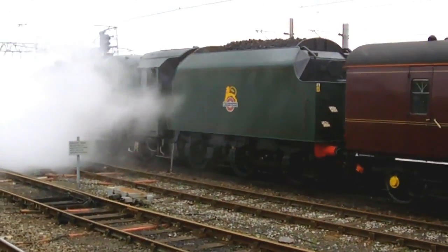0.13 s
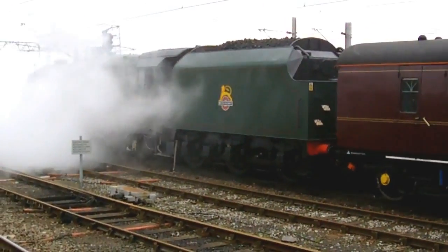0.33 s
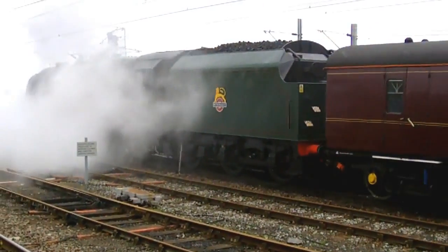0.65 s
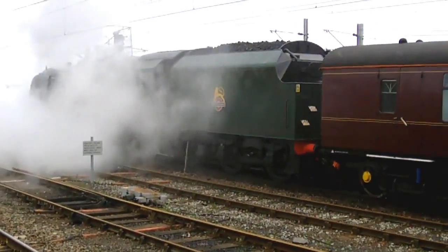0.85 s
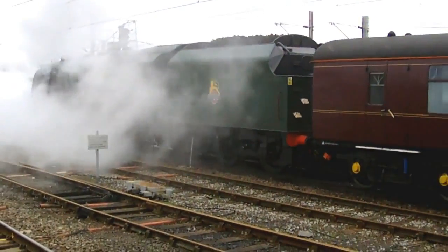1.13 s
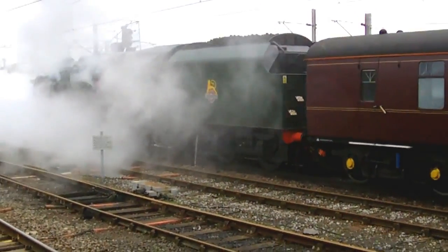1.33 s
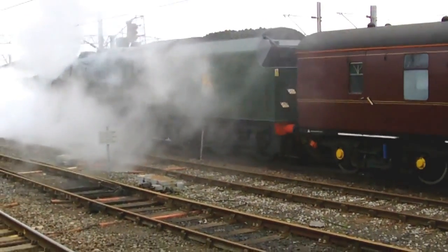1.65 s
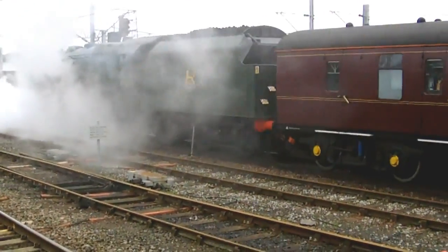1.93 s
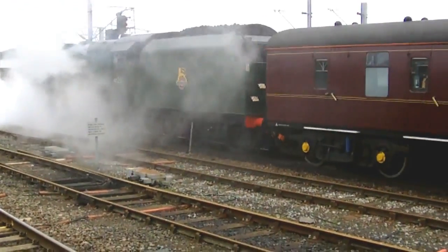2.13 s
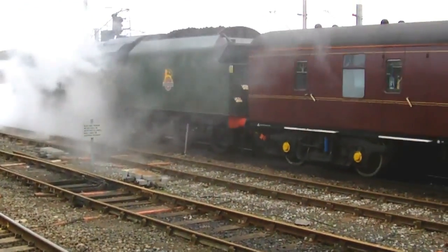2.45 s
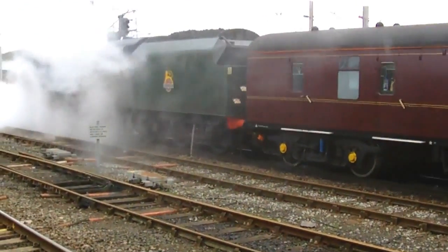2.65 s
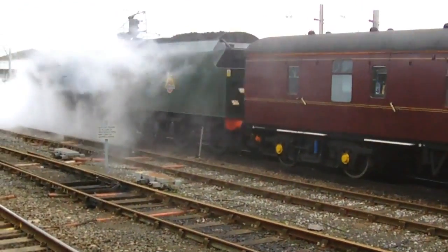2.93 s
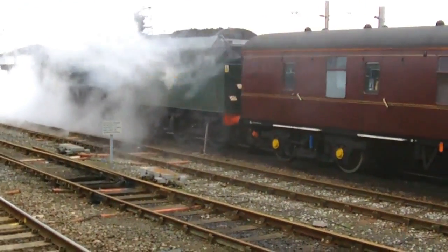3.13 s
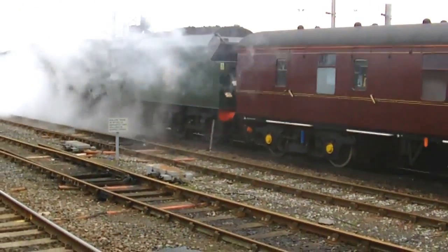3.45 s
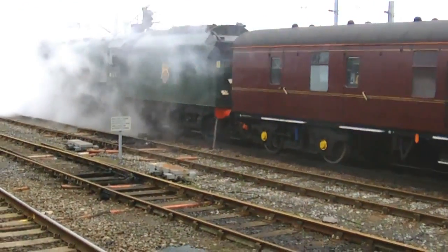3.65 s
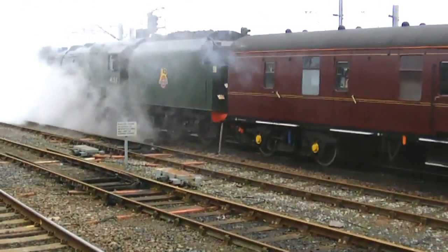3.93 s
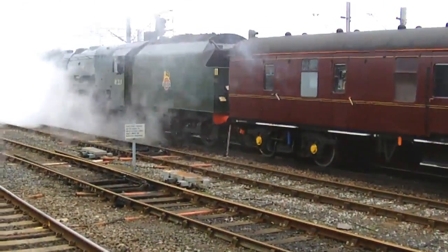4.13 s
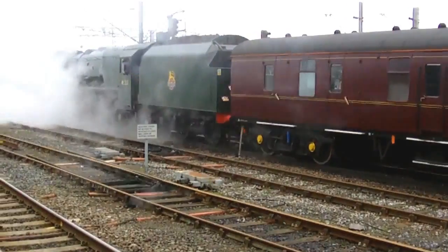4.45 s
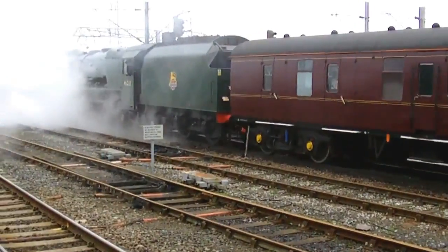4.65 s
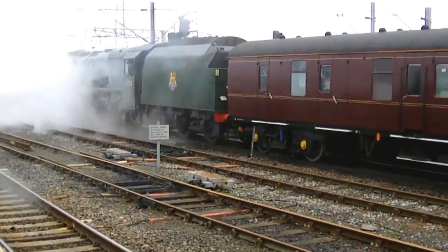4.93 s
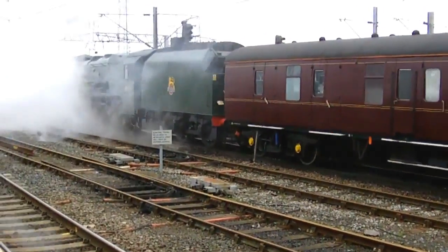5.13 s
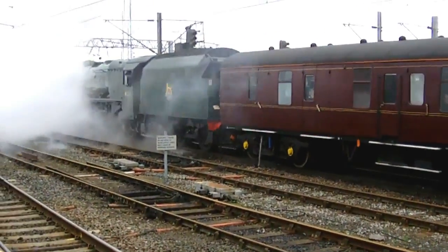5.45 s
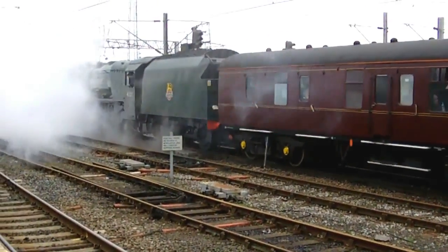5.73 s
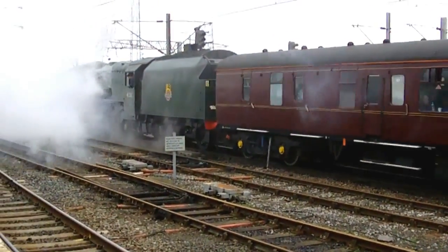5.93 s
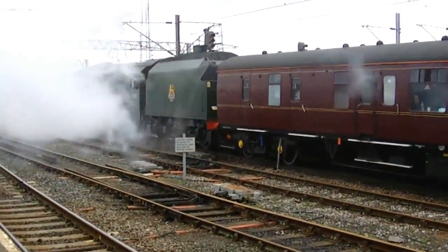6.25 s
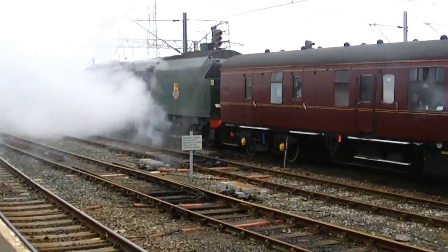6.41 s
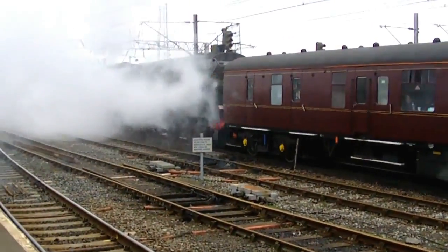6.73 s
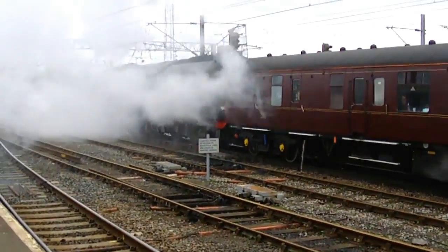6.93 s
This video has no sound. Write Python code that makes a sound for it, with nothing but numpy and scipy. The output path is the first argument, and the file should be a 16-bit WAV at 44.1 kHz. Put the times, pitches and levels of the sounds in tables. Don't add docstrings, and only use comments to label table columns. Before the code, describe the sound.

A steam locomotive pulls away with drain cocks blowing a loud, harsh, bright hiss, broken by wind gusts that knock and choke a small microphone.

```python
import sys
import numpy as np
from scipy import signal
from scipy.fft import rfft, irfft, next_fast_len
from scipy.io import wavfile
from scipy.ndimage import uniform_filter1d, map_coordinates

SR = 44100
rng = np.random.default_rng(int(sys.argv[2]) if len(sys.argv) > 2 else 0)


def to_linear_factor(level_db):
    exponent = np.asarray(level_db, float) / 20
    return 10 ** exponent


def generate_wav(sig):
    pcm = np.round(np.clip(np.atleast_2d(sig).T, -1, 1) * 32767).astype(np.int16)
    wavfile.write(sys.argv[1], SR, pcm)


N = 312228

# (time [s], level [dB], fullness of the body [dB])
STEAM = [(0, -7, -1.5), (.69, -9.5, 0.5), (.8, -15, 1.5), (1.21, -10, 0.5), (1.32, -8, 1.5),
         (2.03, -6.5, -2), (2.6, -12.5, -1), (3.05, -8.5, .8), (3.72, -8, -2), (4.17, -14.5, -0.7),
         (4.62, -12, 0.5), (4.74, -9.5, -0.6), (5.64, -16.5, -0.8), (5.72, -19.5, -1.6), (6.13, -17.5, 1.5),
         (6.21, -12, 0.5), (6.89, -9, 1.3), (7.07, -11, -1)]
CALM_DB = -42.5


def unit(x):
    return x / np.sqrt(np.mean(x ** 2) + 1e-20)


def along(points, hz):
    f, v = np.transpose(points)
    return np.interp(np.log(hz + 1), np.log(f + 1), v)


def curves(rows):
    s, *columns = np.transpose(rows)
    return [np.interp(np.arange(N) / SR, s, column) for column in columns]


def wobble(rate):
    knots = rng.standard_normal(int(N * rate / SR) + 4)
    return map_coordinates(knots, [np.arange(N) * rate / SR])


def filtered(x, response):
    m = next_fast_len(N + 8192)
    hz = np.fft.rfftfreq(m, 1 / SR)
    return irfft(rfft(x, m) * response(hz), m)[..., :N]


def rush(response, patchy_db):
    z = signal.stft(rng.standard_normal(N + 512), nperseg=512)[2]
    patches = uniform_filter1d(rng.standard_normal(z.shape), size=6, axis=0)
    patches = uniform_filter1d(patches, size=8, axis=1)
    noise = signal.istft(z * to_linear_factor(patchy_db * unit(patches)), nperseg=512)[1][:N]
    return unit(filtered(noise, response))


def bumps(rows, edge_s):
    out, t = np.zeros(N), np.arange(N) / SR
    for s, length, height in rows:
        near = slice(max(int((s - .03) * SR), 0), int((s + length + .03) * SR))
        inside = np.minimum(t[near] - s, s + length - t[near])
        shape = np.clip(inside / edge_s + 1, 0, 1)
        out[near] = np.maximum(out[near], height * shape)
    return out


def tents(rows, rise, fall, floor):
    coarse = np.arange(0, N, 64)
    late = coarse / SR - np.array(rows)[:, :1]
    top = np.array(rows)[:, 1:] - np.where(late < 0, -rise * late, fall * late)
    return np.interp(np.arange(N), coarse, np.maximum(top.max(axis=0), floor))


def level():
    # (deepest time [s], depth [dB], recovery [s])
    ducks = np.array([(.73, 8.5, 0.056), (.94, 5.5, 0.034), (1.1, 3.5, .03), (1.205, 6.5, 0.017),
                      (1.47, 3, 0.11), (1.81, 4.5, 0.071), (2.39, 0, 0.067), (2.56, 6, 0.028),
                      (2.71, 7.5, 0.071), (2.879, 8.5, 0.022), (2.97, 7, .06), (3.24, 2, 0.079),
                      (3.47, 2, .06), (3.64, 7, 0.052), (4.27, 10, 0.082), (4.45, 7, 0.094),
                      (4.57, 2, 0.062), (4.82, 7, 0.034), (4.94, 3.5, 0.14), (5.09, 8, 0.058),
                      (5.225, 6, 0.13), (5.35, 14.5, .09), (5.4, 19, 0.069), (5.58, 6, 0.027),
                      (5.75, 5, 0.088), (5.875, 4, 0.15), (6, 5, 0.047), (6.46, 2.5, 0.04),
                      (6.63, 6, 0.036), (6.82, 6.5, 0.026)])
    recovery_db_per_s = ducks[:, 1:2] / ducks[:, 2:]
    return curves(STEAM)[0] - tents(ducks[:, :2], 184, recovery_db_per_s, 0)


def jets():
    # (frequency [Hz], density [dB per Hz])
    jet_spectrum = [(100, -14), (600, -6.5), (1200, -4.5), (2000, -1), (3000, 1), (4200, -1), (7000, -13.5),
                    (8600, -13.5), (9600, -37), (12000, -23), (15000, -20.5), (18000, -38)]
    # (centre [Hz], width [Hz], level [dB])
    capsule = [(5845, 974, -6), (5627, 1600, -3.5)]
    body_db, body_holds, loud_db = -10, 0.26, -13
    body_level = body_db + curves(STEAM)[1] + body_holds * (loud_db - level())

    def peak(f):
        modes = [to_linear_factor(db) * 1j * f * w / (c * c - f * f + 1j * f * w) for c, w, db in capsule]
        return sum(modes) ** 2

    def port(f):
        return to_linear_factor(-6 / (1 + (9100 / (f + 1)) ** 24))

    spit = to_linear_factor(1.19 * wobble(11) + 1.0 * wobble(36) + 0.86 * wobble(150))
    body = to_linear_factor(body_level + 2.5) * rush(lambda f: to_linear_factor(along(jet_spectrum, f)), patchy_db=1.35)
    resonance = rush(peak, patchy_db=1.5)
    return filtered(unit(spit) * (resonance + body), port)


def wind():
    # (start time [s], length [s], buffet [dB])
    gusts = [(0.487, 0.086, -42), (.79, 0.099, -32), (0.907, 0.047, -28.5), (0.985, .1, -34),
             (1.177, 0.024, -31.5), (1.287, .08, -34), (1.412, 0.035, -33), (1.596, 0.14, -36),
             (1.87, 0.018, -35), (2.286, .06, -35.5), (2.449, .1, -31.5), (2.57, .16, -33),
             (2.806, 0.064, -30), (2.915, 0.068, -29.5), (3.152, 0.046, -36), (3.21, 0.064, -31),
             (3.315, 0.092, -35), (3.436, 0.08, -29.5), (3.7, 0.18, -37.5), (4.034, 0.17, -33.5),
             (4.656, 0.032, -34.5), (4.911, 0.061, -29), (5.015, 0.095, -33.5), (5.272, 0.031, -26.5),
             (5.35, 0.052, -37), (5.55, 0.084, -34), (5.721, 0.015, -31), (5.847, .08, -34.5),
             (6.504, 0.083, -33), (6.96, 0.026, -35)]
    return CALM_DB + bumps([(s, length, db - CALM_DB) for s, length, db in gusts], edge_s=.02)


def flurries():
    shortest_s, push_db, scatter_db, growth = 0.00396, 9, 1.5, .08
    when, long, hard = rng.random(size=(150, 3)).T
    s = (np.arange(len(when)) + when) / len(when) * (N - 1) / SR
    above_calm_db = wind()[(s * SR).astype(int)] - CALM_DB
    push = push_db + scatter_db * (2 * hard - 1) + growth * above_calm_db
    return list(zip(s, shortest_s * (1 + 2 * long ** 2), push))


def amplifier(hiss):
    # (time [s], length [s], push [dB])
    leans = [(.497, 0.018, 13), (.941, .025, 13), (1.047, 0.023, 15.5), (1.17, .019, 13),
             (1.724, 0.026, 15), (1.843, 0.042, 17), (2.558, 0.037, 18), (2.675, 0.015, 12),
             (3.033, 0.058, 11.5), (3.314, 0.021, 9.5), (3.373, 0.026, 15), (3.688, .039, 16),
             (3.778, 0.024, 11), (3.824, 0.032, 17), (3.872, 0.015, 17), (4.027, 0.015, 12),
             (4.074, .018, 13), (4.218, 0.035, 13), (4.525, .025, 19), (4.654, .036, 12),
             (4.754, 0.026, 13), (4.995, .016, 13), (5.046, .034, 10.5), (5.186, .011, 22),
             (6.221, .046, 14.5), (6.326, 0.025, 13), (6.382, .022, 22), (6.443, 0.033, 16.5),
             (6.77, 0.043, 13), (6.957, 0.03, 14.5)]
    # (time [s], push [dB])
    flicks = [(.569, 12), (.602, 13), (1.001, 13), (1.085, 12), (1.131, 7), (1.23, 13), (1.292, 13),
              (1.338, 12.5), (1.393, -3), (1.433, 13.5), (1.593, 10), (1.667, 9), (1.682, 10),
              (2.188, 11.5), (2.266, 11), (2.33, 10), (2.38, 15), (2.503, 16), (2.924, 12), (3.109, 12),
              (3.461, 13), (3.648, 11), (4.053, 14), (4.794, 14), (5.446, 15.5), (6.556, 9), (6.625, 11),
              (6.719, 16.5), (6.866, 14), (7.008, 11.5)]
    # (time [s], length [s], depth [dB])
    stalls = [(.709, .008, 34), (1.174, .009, 12), (2.351, .007, 21), (2.577, .005, 27), (2.771, .011, 31),
              (3.6955, .0105, 14), (3.843, .007, 13), (3.852, .018, 41), (3.926, .005, 24),
              (3.986, .012, 33), (4.083, .004, 26), (4.118, .008, 24), (4.236, .008, 38), (4.315, .02, 43),
              (4.397, .014, 46), (4.418, .022, 82), (4.517, .01, 40), (4.548, .007, 24), (5.122, .011, 36),
              (5.157, .004, 36), (5.193, .004, 21), (5.258, .004, 27), (5.311, .02, 44),
              (5.3335, .0062, 30), (5.685, .039, 46), (5.851, .008, 22), (6.08, .007, 23),
              (6.317, .009, 31), (5.704, .018, 85), (6.402, .006, 24)]
    # (time [s], depth [dB])
    pinches = [(1.058, 18), (1.0665, 11), (1.138, 20), (1.858, 16), (2.5265, 18), (2.561, 18), (2.586, 22),
               (2.6135, 25), (2.631, 16), (3.789, 24), (3.9335, 18), (4.0905, 15), (4.195, 16), (4.252, 22),
               (4.534, 19), (4.764, 14), (5.216, 14), (5.339, 17), (5.349, 16), (5.394, 12), (5.489, 20),
               (5.494, 17), (5.56, 20), (5.736, 18), (5.985, 24), (5.994, 25), (6.2535, 17), (6.457, 14),
               (6.797, 16), (6.968, 18)]
    flick_s, pinch_s = .01, .0025
    touches = stalls + [(s, pinch_s, db) for s, db in pinches]
    stall_db = bumps(touches, edge_s=.001)
    approach = bumps([(s, length, min(.22 * db, 4.6)) for s, length, db in touches], edge_s=.005)
    all_leans = leans + [(s, flick_s, db) for s, db in flicks] + flurries()
    push = np.maximum(.22 * bumps(all_leans, edge_s=0.0013), approach) + 0.51 * wobble(200)
    headroom = 4.17 + 0.28 * wobble(60) - push
    knee = .08

    def rail(v):
        return -knee * np.logaddexp(0, (headroom - v) / knee)

    memory = np.exp(-1 / (0.002 * SR))
    rebound_db = 6 * signal.lfilter([1 - memory], [1, -memory], stall_db > 12)
    return (rail(hiss) - rail(0)) * to_linear_factor(rebound_db - .93 * stall_db), stall_db


def wind_gaps(x):
    # (centre [Hz], width [Hz], depth [dB])
    notches = [(297, 184, -43), (907, 185, -17)]

    def gap(f, c, w, db):
        return (c * c - f * f + 1j * f * w * to_linear_factor(db)) / (c * c - f * f + 1j * f * w)

    return filtered(x, lambda f: np.prod([gap(f, *row) for row in notches], axis=0))


def buffet():
    # (frequency [Hz], density [dB per Hz])
    thump_spectrum = [(20, -58), (90, -29), (200, -5), (400, -1), (700, -3.5), (1000, -3), (2000, -22)]
    lumps = to_linear_factor(1.2 * wobble(25) + 2.4 * wobble(90))
    gusting = rush(lambda f: to_linear_factor(along(thump_spectrum, f)), patchy_db=2.5)
    thumps = unit(wind_gaps(lumps * gusting))
    rumble = rush(lambda f: f / (f + 60) / (1 + (f / 130) ** 4), patchy_db=-4)
    return to_linear_factor(wind() - 1.5) * thumps + to_linear_factor(-73) * rumble


def stray(x):
    # (frequency [Hz], level [dB])
    stray_spectrum = [(30, -16), (300, -12), (1000, -23), (3000, -38), (6000, -30), (9000, -22.5),
                      (15000, -13)]
    z = signal.stft(x, nperseg=1024)[2]
    blocks = z.shape[1] // 2 + 1
    frames = np.repeat(rng.random(blocks) < .2, 2)[:z.shape[1]]
    bands = rng.random((33, blocks)) < .35
    bands = np.repeat(np.repeat(bands, 16, axis=0), 2, axis=1)[:z.shape[0], :z.shape[1]]
    turn = np.exp(2j * np.pi * rng.random(z.shape))
    leak = signal.istft(z * turn * frames * bands, nperseg=1024)[1][:N]
    return filtered(leak, lambda f: to_linear_factor(along(stray_spectrum, f) + 2))


def knocks():
    # (time [s], peak [dB], pitch [Hz])
    hits = [(0.854, -16, 568), (0.93, -12, 560), (1.029, -24, 1650), (1.185, -9, 1720), (1.44, -11, 1470),
            (2.925, -9.5, 590), (3.433, -18, 467), (4.927, -12, 660), (4.989, -1, 1560), (5.021, -19, 420),
            (5.094, -24, 397), (5.27, -27, 437), (5.365, -18, 1300), (5.386, -7.5, 1890), (5.728, -4, 1560),
            (5.734, -20, 480), (5.864, -29, 540), (5.912, -17.5, 633)]
    out, t = np.zeros(N + SR), np.arange(SR // 20) / SR
    for s, db, hz in hits:
        tone = np.sin(2 * np.pi * hz * t) + .5 * np.sin(2 * np.pi * 0.79 * hz * t)
        ring = to_linear_factor(-60 * t * hz / 12) * (1 - np.exp(-t / 0.0033)) * tone
        out[round(s * SR):][:len(t)] += to_linear_factor(db - 10.0) * ring / np.abs(ring).max()
    return out[:N]


def whistle():
    # (peak time [s], level [dB])
    swells = [
        (1.26, -23),
        (2.91, -19),
        (3.02, -19),
        (4.62, -24),
        (4.78, -19.5),
    ]
    level_db = tents(swells, rise=120, fall=142, floor=-47)
    tone = rush(lambda f: 1 / (1 + ((f - 2980) / 90) ** 2), patchy_db=3.5)
    return to_linear_factor(1.77 * level_db + 14.0) * tone


def pops():
    # (time [s], peak [dB])
    flips = [
        (5.3353, 0),
    ]
    # (frequency [Hz], decay by 60 dB [s], level [dB])
    ringing = [(770, 0.011, -17), (1420, 0.0022, 4.5), (420, 0.011, -13), (110, 0.013, -18)]
    out, t = np.zeros(N + SR), np.arange(SR // 20) / SR
    ring = sum(to_linear_factor(db - 60 * t / t60) * np.cos(2 * np.pi * hz * t) for hz, t60, db in ringing)
    crossing_s = .0004
    crossing = -.5 * np.sin(2 * np.pi * 4300 * t) * (t < crossing_s)
    for s, db in flips:
        out[round(s * SR):][:len(t)] += to_linear_factor(db) * ring
        out[round((s - crossing_s) * SR):][:len(t)] += to_linear_factor(db) * crossing
    return out[:N]


def scene():
    return np.tile(jets(), (2, 1))


def top_cut(x):
    return signal.sosfilt(signal.butter(12, 15690, fs=SR, output="sos"), x)


def record(dry):
    hiss, stall_db = amplifier(dry[0])
    cut_hz, lift_hz, lift_db = 1100, 10500, 3

    def colour(f):
        return (1j * f / (cut_hz + 1j * f)) ** 2 * to_linear_factor(lift_db / (1 + (lift_hz / (f + 1)) ** 8))

    hiss = wind_gaps(filtered(hiss, colour))
    sound = to_linear_factor(level() - 0.3) * hiss
    sound = sound + to_linear_factor(-.8 * stall_db) * (buffet() + whistle())
    sound = sound + knocks() + pops()
    sound = filtered(sound, lambda f: 1 / (1 + (f / 15500) ** 80))
    sound = sound / (1 + np.abs(sound / .96) ** 8) ** (1 / 8)
    return top_cut(sound + np.outer([1, -1], stray(sound)))


dry = scene()
out = record(dry)
generate_wav(out)
```